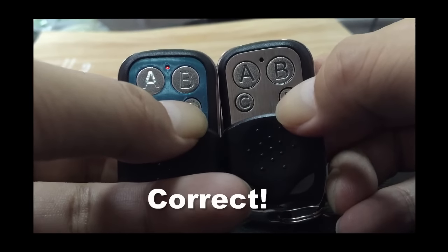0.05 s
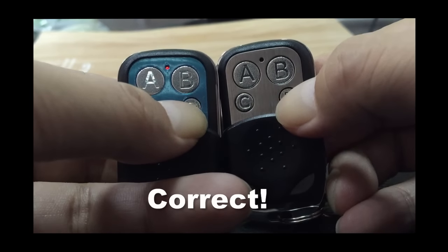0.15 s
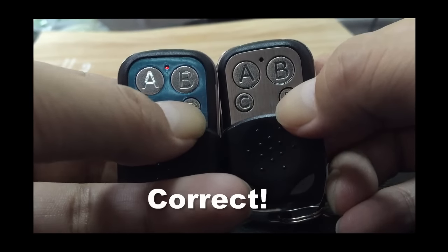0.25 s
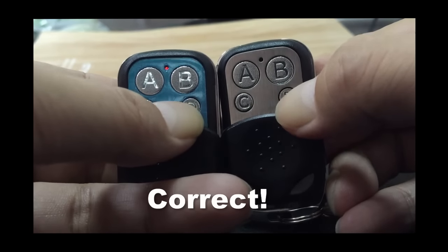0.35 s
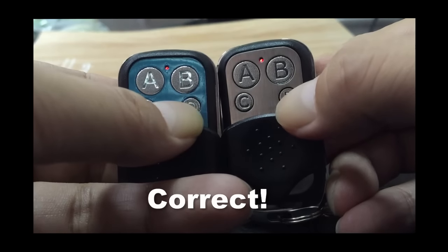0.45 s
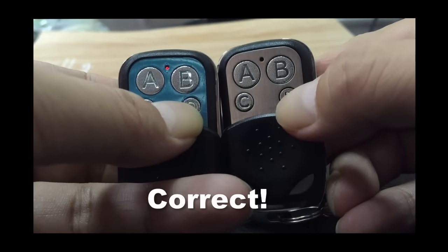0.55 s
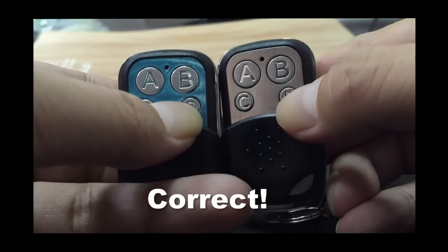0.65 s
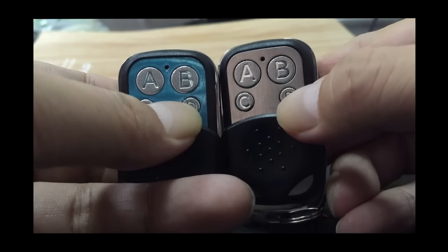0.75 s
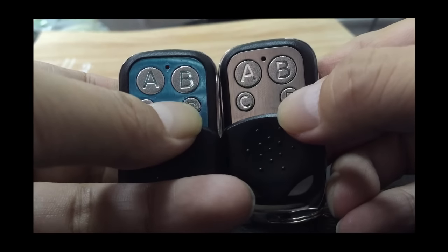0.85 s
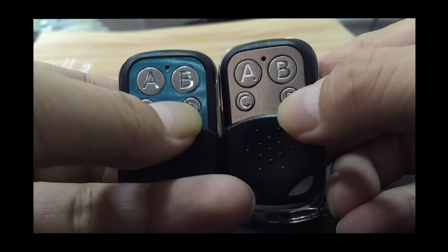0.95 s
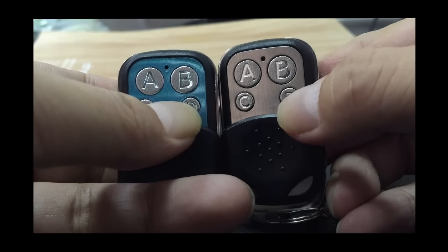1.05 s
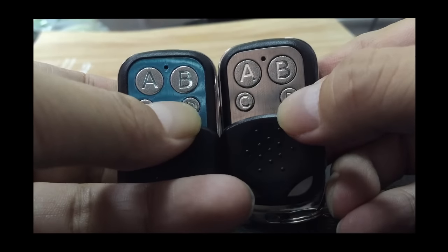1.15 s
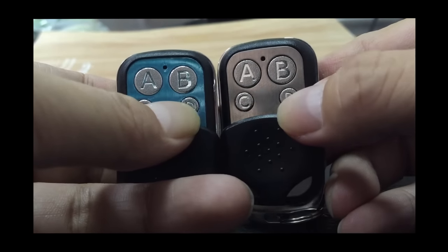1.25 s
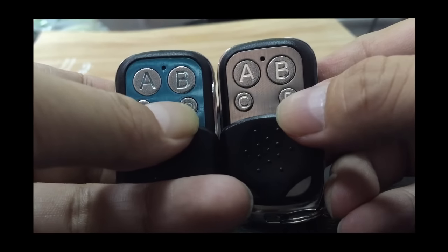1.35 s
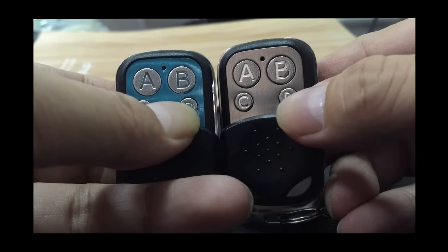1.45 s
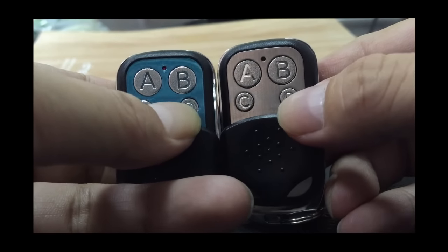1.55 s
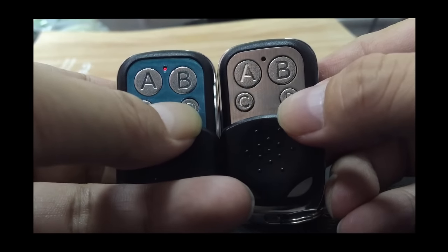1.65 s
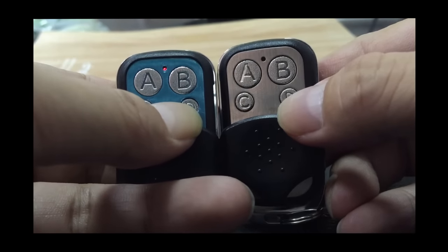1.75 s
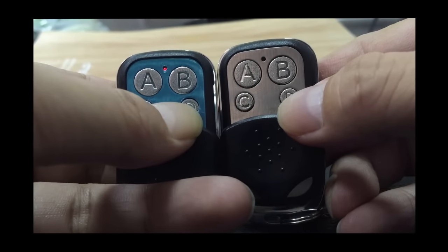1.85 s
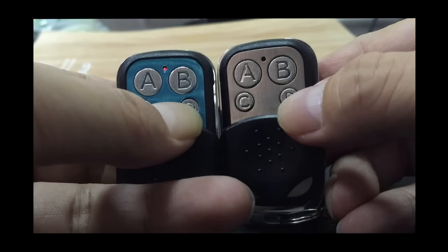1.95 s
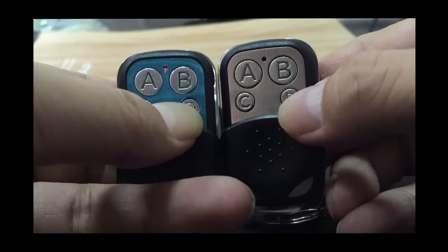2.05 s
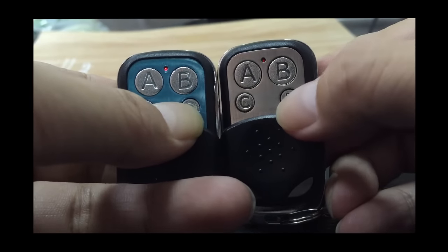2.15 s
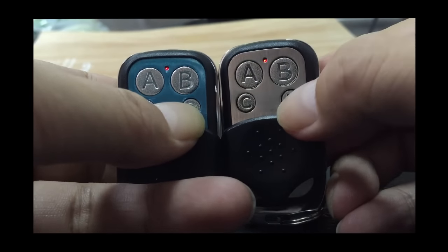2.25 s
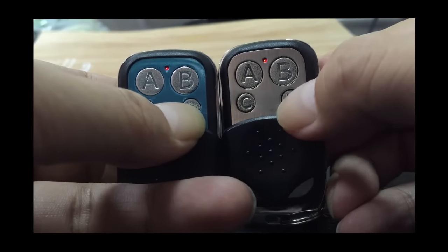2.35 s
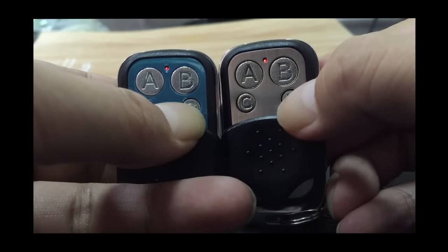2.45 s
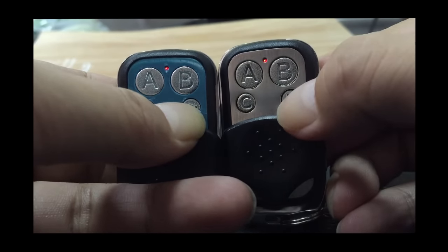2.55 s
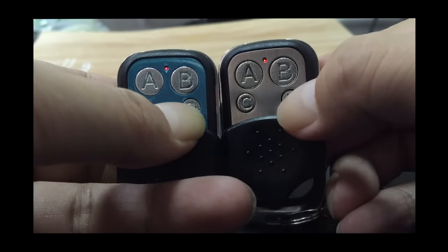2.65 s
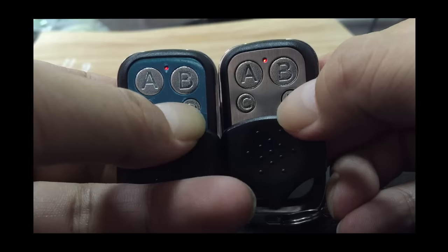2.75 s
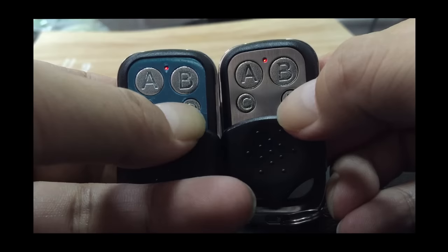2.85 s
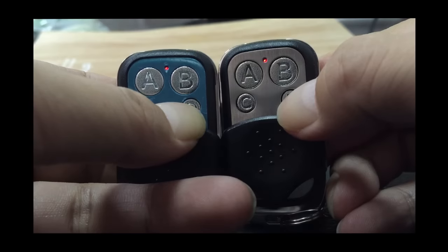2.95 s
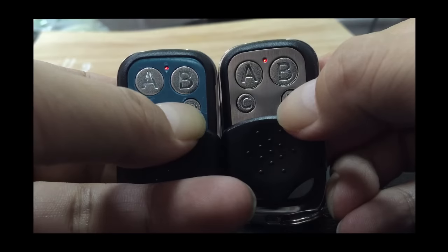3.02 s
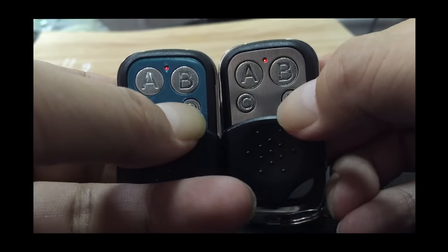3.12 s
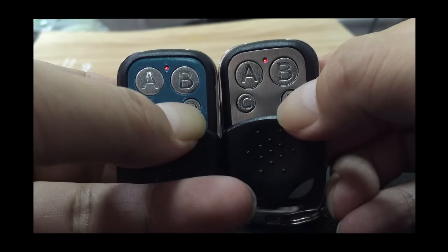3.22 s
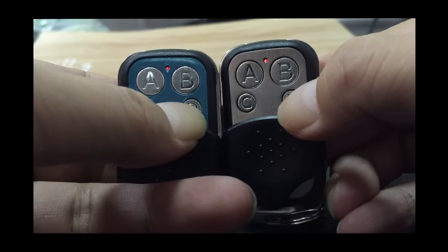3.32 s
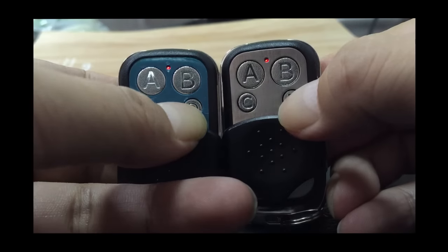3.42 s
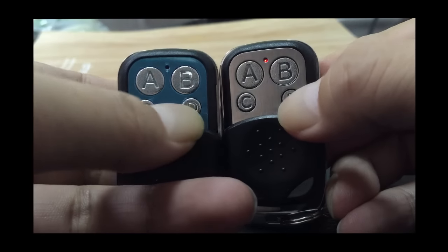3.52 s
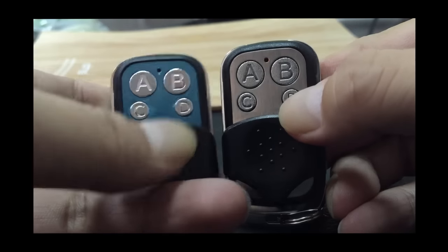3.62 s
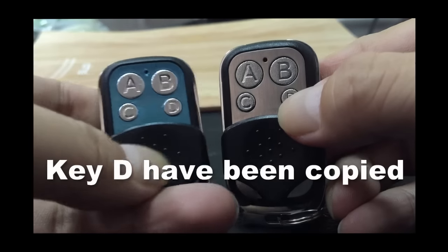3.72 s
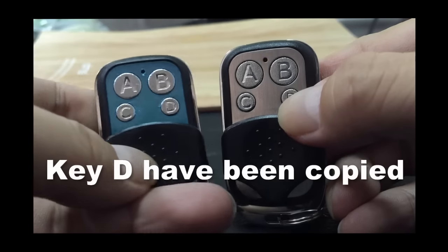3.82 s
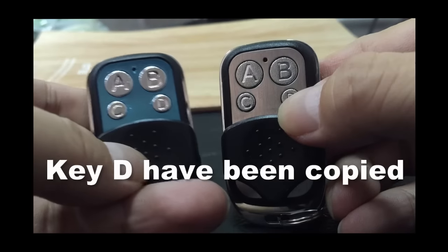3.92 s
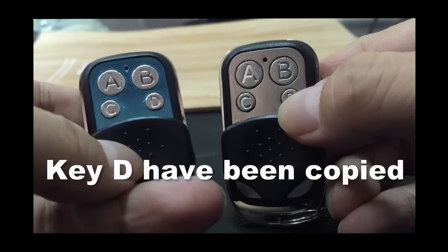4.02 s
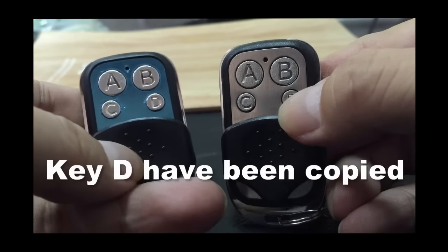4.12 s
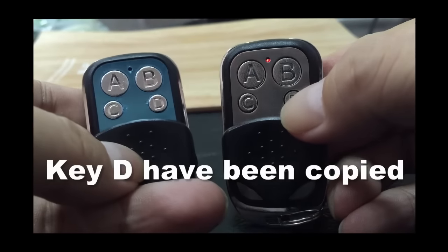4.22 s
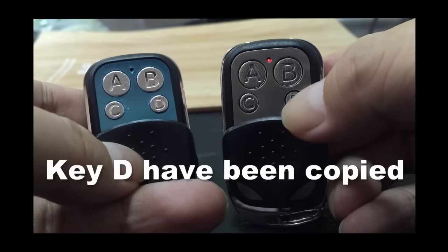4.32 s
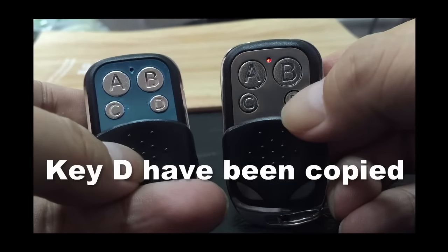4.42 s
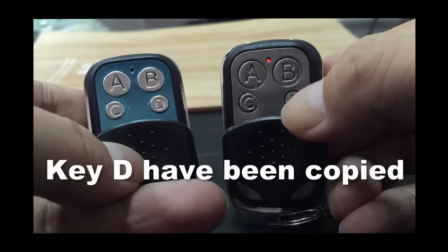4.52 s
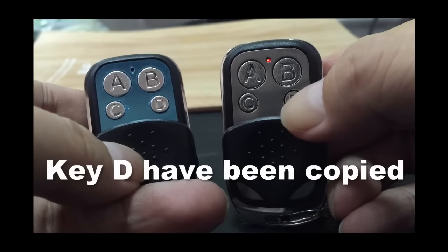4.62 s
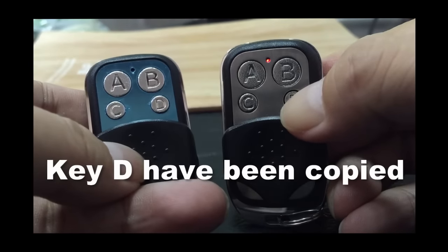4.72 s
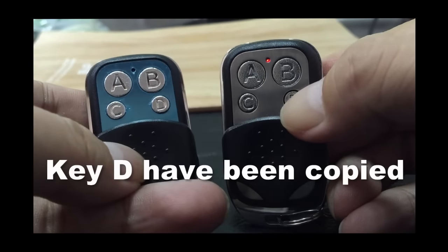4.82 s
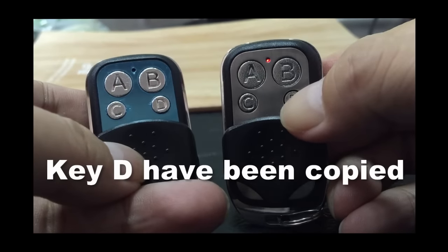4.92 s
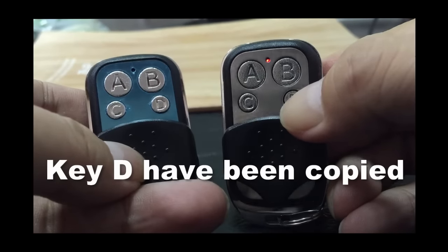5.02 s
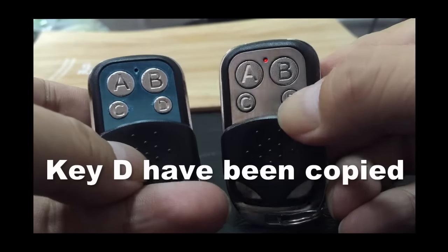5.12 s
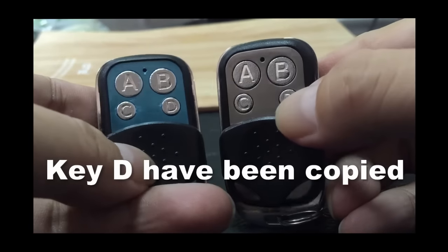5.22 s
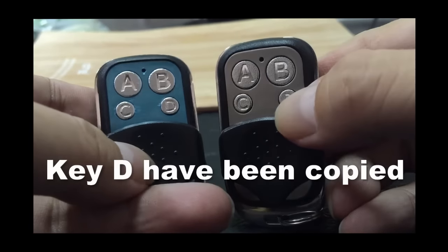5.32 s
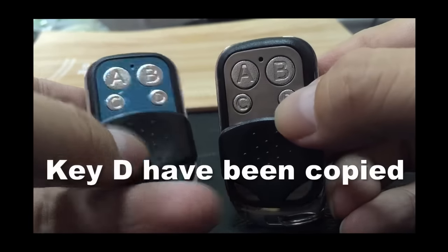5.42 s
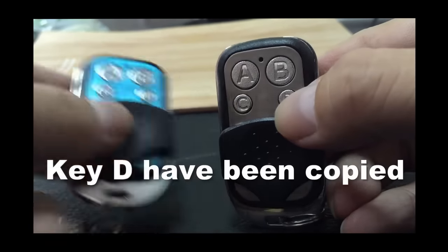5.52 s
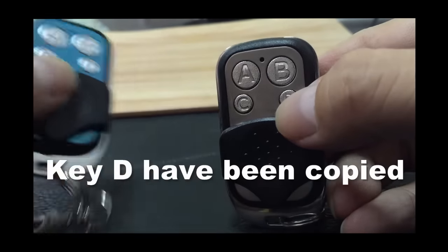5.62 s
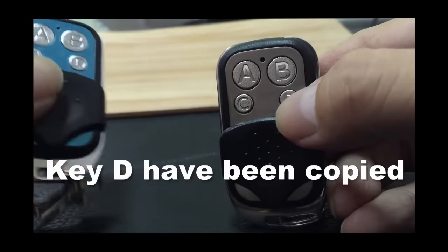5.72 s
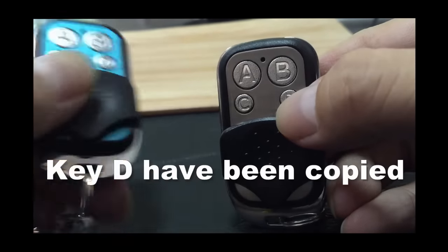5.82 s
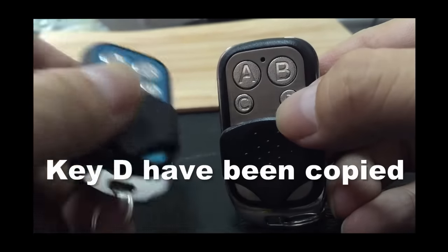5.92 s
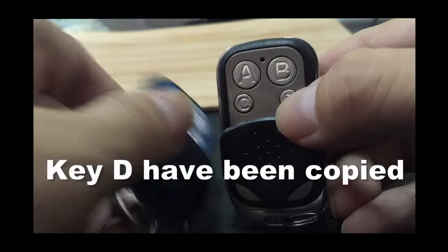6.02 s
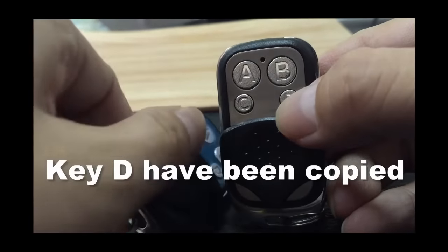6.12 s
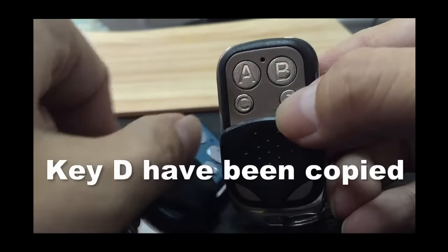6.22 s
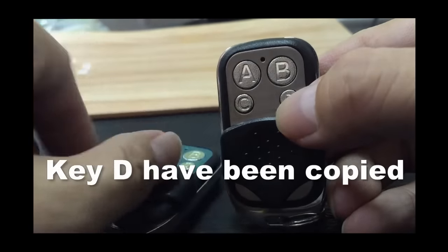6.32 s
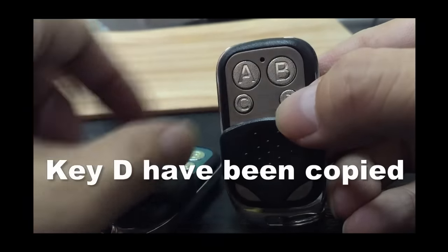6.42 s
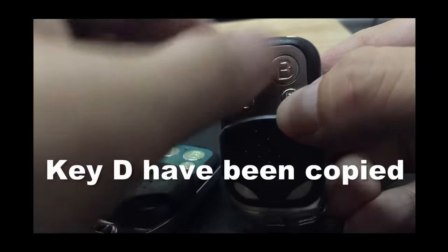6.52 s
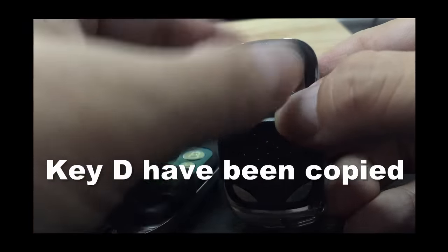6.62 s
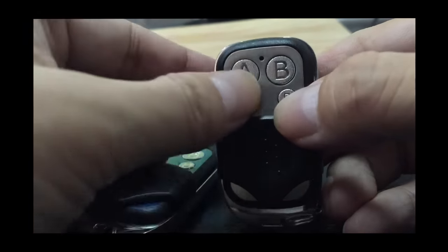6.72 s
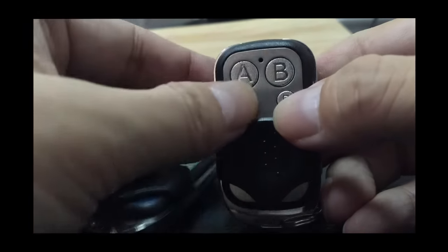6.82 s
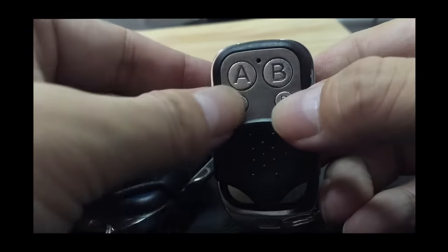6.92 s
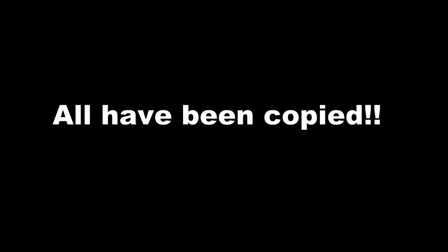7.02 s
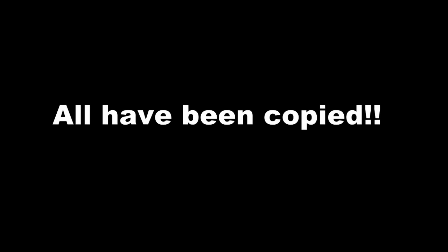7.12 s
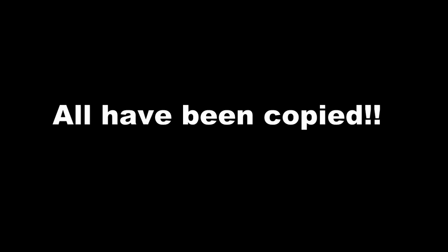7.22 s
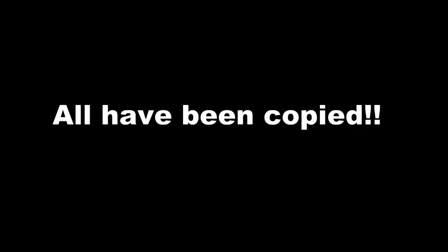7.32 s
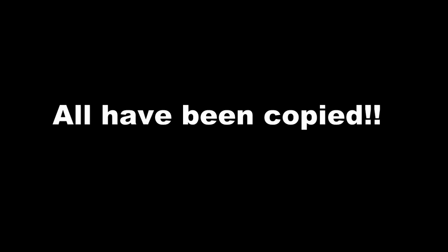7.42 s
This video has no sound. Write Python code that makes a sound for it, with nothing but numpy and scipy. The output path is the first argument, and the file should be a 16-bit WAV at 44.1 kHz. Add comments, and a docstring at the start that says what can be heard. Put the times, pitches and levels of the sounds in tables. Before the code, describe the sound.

In a quiet indoor room with a low, wavering hum, thumbs press buttons on two small plastic remotes very near the microphone. Crisp dry clicks come irregularly, some in close pairs, with faint finger rustle. Later one remote is carried off, its key ring rattling and scraping, and set on the desk with a hard knock. Two more clicks, the last very faint, then an abrupt stop.

```python
"""A dull, wavering hum of a quiet room, then sharp clicks close to the microphone: thumbs press the buttons
of two small plastic remotes. Each metal dome snaps and rings the shell as dying sines.
Fingers rustle and plastic scrapes as random slips; later one remote is carried off with its key ring
rattling in chattering ticks and is laid on the desk with ringing knocks. The sound then stops short."""
import sys
import numpy as np
from scipy import signal
from scipy.fft import rfft, irfft
from scipy.io import wavfile
from scipy.ndimage import uniform_filter1d

SR = 44100
rng = np.random.default_rng(int(sys.argv[2]) if len(sys.argv) > 2 else 0)


def int16_out(signal):
    """Quantize to a 16-bit WAV file."""
    q = np.round(np.clip(np.atleast_2d(signal).T, -1, 1) * 32767)
    wavfile.write(sys.argv[1], SR, q.astype(np.int16))


N = 328986  # length [samples]
SLIP_SPREAD_DB = 3.6  # unevenness of the tiny slips


def gain_of(db):
    """Decibels to an amplitude factor."""
    return 10 ** (np.asarray(db) / 20)


def evened(x):
    """Scales to rms 1."""
    return x / np.sqrt(np.mean(x ** 2) + 1e-20)


def read(points, hz):
    """Reads a table on a log-frequency axis."""
    f, value = np.transpose(points)
    return np.interp(np.log(hz + 1), np.log(f + 1), value)


def add(mix, s, sound):
    """Mixes a sound in at a time [s]."""
    part = mix[..., round(s * SR):][..., :sound.shape[-1]]
    part += sound[..., :part.shape[-1]]


def coloured(x, points):
    """Filters a signal by a (frequency [Hz], level [dB]) table."""
    spectrum = rfft(x)
    hz = np.fft.rfftfreq(len(x), 1 / SR)
    return irfft(spectrum * gain_of(read(points, hz)), len(x))


def ring(modes, extra_db, seconds, rise_s, late_s=0):
    """Dying sines of alternate sign, as neighbouring modes are; peak 1."""
    hz, db, t60 = np.transpose(modes)[:, :, None]
    t = np.maximum(np.arange(round(seconds * SR)) / SR - late_s, 0)
    sign = (-1.) ** np.arange(len(modes))[:, None]
    decay = gain_of(db + extra_db[:, None] - 60 * t / t60)
    out = (sign * decay * np.sin(2 * np.pi * hz * t)).sum(0)
    out *= 1 - np.exp(-t / rise_s)
    return out / abs(out).max()


def hum():
    """Dull noise in drifting patches with fuzzy low tones, each a narrow band of noise."""
    # colour of the dull room noise: (frequency [Hz], level [dB])
    air_colour = [(25, -43.5), (40, -24.5), (62, -13), (80, -6), (125, -7), (156, -2), (278, -4),
                  (330, -8.5), (430, -11.5), (510, -15.5), (600, -12), (782, -15.5), (950, -16.5),
                  (1150, -27), (1330, -25), (1600, -30.5), (2310, -33.5), (9000, -47), (14500, -54),
                  (16500, -71.5)]
    # wavering tones of the hum: (frequency [Hz], width [Hz], rms level [dB])
    hum_tones = [(47.5, 6.6, -59), (86, 4.7, -62.5), (97, 8.2, -56), (146, 6.5, -61.5), (169, 8, -58),
                 (192, 8, -63.5), (233.2, 14, -58), (267, 7.4, -56.5), (292.6, 13, -54.5)]
    air_db, patch_db = -49, 2.22
    hz = np.fft.rfftfreq(N, 1 / SR)
    air = coloured(rng.standard_normal(N), air_colour)
    z = signal.stft(air, nperseg=1024, noverlap=768)[2]
    over_pitch = uniform_filter1d(rng.standard_normal(z.shape), 8, 0)
    patches = evened(uniform_filter1d(over_pitch, 12, 1))
    drifting = signal.istft(z * gain_of(patch_db * patches), nperseg=1024, noverlap=768)[1][:N]
    out = gain_of(air_db) * evened(drifting)
    for f, width, db in hum_tones:
        band = rfft(rng.standard_normal(N)) / (1 + (2 * (hz - f) / width) ** 2)
        out += gain_of(db) * evened(irfft(band, N))
    return out


def snaps():
    """The dome snaps through and rebounds a fraction of a millisecond later, waking the modes in another mix.
    Returns left, right and what spreads into the room."""
    # dome presses: (time [s], rebound delay [ms], level with the energy packed into snap_ms [dB],
    # then nine zone levels, low to high, against the zone at 6200 Hz [dB])
    presses = [(0.351, 0.57, -43.5, -3, 14, -8, -10, -21, -11, 9, 6.0, 12),
               (0.807, 0.6, -9, -10, -12, -10.5, -8, -20, -7, -5.5, -4.5, -1),
               (0.8536, 0.53, -8, -5.5, 0.5, 2, 5, -5, 4.5, -2.5, -6.5, 4),
               (1.315, .6, -54.5, 0, 6.5, 0.5, -6, -13.0, -7.5, 9.0, 16, 9.5),
               (1.6976, 0.091, -17.5, 9, 2.5, 14.5, 16.5, 22.5, 13.5, 15.5, 9.5, 20),
               (2.2904, 0.55, -15, 0.5, 1.5, 3.5, 7, -5, -2, 3, 10.5, 3),
               (2.482, .6, -34.5, -22.5, -21, -13.0, -18, -19, -5, 7, 10, 2),
               (3.673, 0.57, -10.5, 0.5, 4, -1, -4.5, -5.5, -4.5, 0, -6, -11),
               (3.784, 0.61, -16.5, 8.5, 15, 11, 13, 5.5, 12.5, 5, 15, 8),
               (3.794, .5, -10, -16, -3.5, -5.5, -23, -31, -12, -0.5, -1, -14),
               (4.006, 0.553, -25.5, -12.5, 9.5, 3.5, 6, 6.5, 2.5, 4, -2, -9),
               (4.338, 0.53, -15, -0.5, 2, 8.5, 2.5, -3, 3, 9.5, 10.5, 12),
               (5.322, 0.57, -10.5, -9, -11, -7, -11.5, -12, -11, 1, -4, -8),
               (6.862, 0.47, -12, -4, -4, 4.5, 1, 13, -2.5, 12.5, 7.5, -2),
               (7.097, 0.62, -39.5, -6.5, -9.5, 22.5, 8, 5, -15, 16, -10, -4)]
    # modes of the plastic shell: (frequency [Hz], level [dB], t60 [s])
    shell_modes = [(490, -12, 0.0027), (600, -4, .007), (753, 0, 0.007), (980, 1, 0.0067),
                   (1440, -3, 0.0084), (1724, 0, 0.0044), (2075, 2, 0.0063), (2350, -0.5, .005),
                   (2600, 0.5, 0.0047), (3090, -4.5, 0.0042), (3680, 0.5, 0.0033), (3850, -3, 0.0034),
                   (4300, 7.5, 0.0034), (4760, 2.5, 0.00042), (5810, 7.5, 0.0033), (6860, -2.5, 0.0061),
                   (7383, 3.5, 0.0026), (8430, 2, 0.0034), (9460, 1.5, 0.0041), (11200, -3, 0.0041),
                   (11350, 2.5, 0.0023), (12100, 0, .003), (12900, 2.5, 0.0025), (16000, -6.5, 0.0071)]
    # centres of the zones: (frequency [Hz])
    zones_hz = [700, 1100, 2000, 2550, 3100, 4200, 6200, 8600, 11500, 15000]
    snap_ms, start_delay_s = 0.52, .0008  # all clicks start this much after their listed times
    rebound_db, rebound_mix_db, rebound_detune = -6, 1, .008
    blur_hz, spread_db = 2640, 4  # off to the sides the modes blur into one short even crack
    out, hz = np.zeros((3, N)), np.array(shell_modes)[:, 0]
    mixes = rng.standard_normal((len(presses), 3, len(shell_modes)))
    for (s, late_ms, db, *zone_db), (detune, strength, lean) in zip(presses, mixes):
        all_zones_db = np.insert(zone_db, zones_hz.index(6200), 0)
        tilt_db = read(list(zip(zones_hz, all_zones_db)), hz)
        shifted = np.array(shell_modes) * np.c_[1 + rebound_detune * detune, np.ones((len(hz), 2))]
        # each mode beams to one side or the other, high ones most
        lean_db = lean * (0.69 + 4.4 * (hz / 16000) ** 2)
        first, second = [], []
        for side in (1, -1):
            side_db = tilt_db + side * lean_db
            first.append(ring(shell_modes, side_db, .03, rise_s=.0005))
            second.append(ring(shifted, side_db + rebound_mix_db * strength, .03,
                               rise_s=0.00021, late_s=late_ms / 1000))
        blow = np.array(first) + gain_of(rebound_db) * np.array(second)
        blow *= np.sqrt(2 * snap_ms * SR / 1000) / np.linalg.norm(blow)
        length = blow.shape[1]
        power = uniform_filter1d(abs(rfft(blow[0])) ** 2, round(blur_hz * length / SR))
        spread = np.roll(irfft(np.sqrt(abs(power)), length), 40)
        spread[80:] = 0
        spread *= gain_of(spread_db) * np.linalg.norm(blow) / np.linalg.norm(spread) / 2
        add(out, s + start_delay_s, gain_of(db) * np.vstack([blow, spread]))
    return out * gain_of([[-.3], [.3], [0]])


def room(x):
    """A short and a longer lumpy reflection and a faint tail start together, just after the direct sound.
    Three random noise tails crossfade in turn, so that no single tail colours every sound."""
    # decay of the faint tail: (frequency [Hz], t60 [s])
    tail_t60 = [(300, 0.47), (700, 0.35), (1400, 0.19), (2500, 0.2), (4000, 0.17), (7000, 0.22),
                (12000, 0.089)]
    # colour of the faint tail: (frequency [Hz], level [dB])
    tail_colour = [(300, 5), (700, 4.5), (1400, 2), (2500, 0), (4000, 0.5), (7000, -1), (12000, -1),
                   (16000, -10)]
    # colour of the lumpy reflections: (frequency [Hz], level [dB])
    near_colour = [(500, -11.5), (1500, -9.5), (3000, -6), (5000, -5.5), (6500, 0), (8500, -5), (12000, 4),
                   (15500, 1), (16500, -11.5)]
    lumpy_db = 6.5  # nearby things throw back uneven clumps
    delay = 30  # [samples]
    out, turn = np.zeros((2, N)), np.pi * np.arange(N) / SR / .07
    for k in range(3):
        hz, t, z = signal.stft(rng.standard_normal(SR // 2), SR, nperseg=256)
        fall_db = read(tail_colour, hz)[:, None] - 60 * t / read(tail_t60, hz)[:, None]
        tail = signal.istft(z * gain_of(fall_db), SR, nperseg=256)[1]
        both = gain_of(-19.0) * tail / np.linalg.norm(tail)
        size = len(tail)
        for db, t60 in ((-29, 0.01), (-21.0, 0.29)):
            near = np.array([coloured(v, near_colour) for v in rng.standard_normal((3, size))])
            near = near * gain_of(-60 * np.arange(size) / SR / t60)
            clumps = evened(uniform_filter1d(rng.standard_normal(size), size=130))
            # one part common to left and right, one part of each side's own
            near = (near[0] + .5 * near[1:]) * gain_of(lumpy_db * clumps)
            both = both + gain_of(db) * near / np.linalg.norm(near[0])
        share = np.sqrt(2 / 3) * np.cos(turn + k * np.pi / 3)
        out[:, delay:] += signal.oaconvolve((x * share)[None], both, axes=1)[:, :N - delay]
    return out


def slides():
    """Dense tiny slips of uneven size, blurred into a scratchy rustle and a duller rub of the shell."""
    # strokes of fingers and links sliding: (start [s], length [s], rustle level [dB], rub level [dB])
    strokes = [(2.357, 0.21, -70.5, -69.5), (3.486, 0.097, -67, -74), (3.562, 0.39, -59, -62),
               (3.853, 0.078, -66.5, -66.5), (4.072, 0.063, -69, -63), (5.585, 0.16, -51.5, -69),
               (5.63, 0.026, -57, -38), (5.644, 0.18, -55, -58.5), (5.806, 0.14, -69, -85),
               (5.916, 0.2, -56.5, -58.5), (6.094, 0.24, -63.5, -68.5), (6.257, 0.085, -61.5, -69),
               (6.31, 0.046, -48, -58.5), (6.352, 0.033, -43, -58), (6.408, 0.087, -69, -76),
               (6.442, 0.16, -56, -64), (6.672, 0.092, -65.5, -73), (6.822, 0.064, -53, -53.5),
               (6.89, 0.053, -86, -59.5), (7.002, 0.069, -63.5, -60.5), (7.077, 0.034, -62.5, -61.5)]
    # colour of the scratchy rustle: (frequency [Hz], level [dB])
    rustle_colour = [(1650, -46), (2450, -8), (3450, -3), (4120, -7), (5670, -5.5), (7200, -4.5),
                     (10600, -9), (15100, -7.5), (16100, -17), (16500, -36.5)]
    # colour of the duller rub: (frequency [Hz], level [dB])
    rub_colour = [(900, -52), (1300, 2), (1600, -9), (2050, 2), (2500, -24.5), (3100, -10), (5000, -70.5)]
    grip_share, lift_share, fade_db = 0.19, 0.24, -6.5  # a stroke swells, fades slowly and lifts off
    level = np.zeros((2, N))
    for start, length, rustle_db, rub_db in strokes:
        share = np.linspace(0, 1, round(length * SR))
        swell = np.minimum(share / grip_share, 1)
        lift = np.minimum((1 - share) / lift_share, 1)
        shape = swell * lift * gain_of(fade_db * np.maximum(share - grip_share, 0))
        add(level, start, gain_of([[rustle_db], [rub_db]]) * shape)
    level = uniform_filter1d(level, 400)
    out = np.zeros(N)
    for gain, colour, per_s in zip(level, (rustle_colour, rub_colour), (900, 250)):
        sizes = gain_of(SLIP_SPREAD_DB * np.minimum(rng.exponential(1, N), 5))
        slips = sizes * (rng.random(N) < per_s / SR)
        flutter = 1.2 + evened(signal.lfilter([1], [1, -.985], slips))
        out += gain * evened(coloured(flutter * rng.standard_normal(N), colour))
    return out


def scrapes():
    """A plastic edge catches and slips unevenly on plastic; each slip rings the same few modes."""
    # scrapes: (start [s], length [s], level [dB], pitch of the strongest mode [Hz])
    strokes = [(3.511, 0.043, -67.5, 2470), (3.539, 0.027, -69, 3870), (3.58, 0.039, -68, 2370),
               (5.659, 0.045, -49, 3560), (5.725, 0.054, -53.5, 3440), (5.78, 0.015, -58, 3460),
               (5.905, 0.016, -56.5, 3380), (5.994, 0.038, -53.5, 3280), (6.138, 0.034, -65, 3400)]
    # scraped modes: (share of that pitch [ratio], level [dB], t60 [s])
    scraped_modes = [(.585, -6, .02), (1, 1, .016), (1.6, -6.5, 0.014), (1.87, -7.5, .014),
                     (2.6, -7, 0.011)]
    slips_per_s, loudest_slip = 380, 3  # the loudest in units of the spread
    out = np.zeros(N)
    sizes = gain_of(SLIP_SPREAD_DB * np.minimum(rng.exponential(1, N), loudest_slip))
    slips = sizes * (rng.random(N) < slips_per_s / SR)
    slips = slips + 0.018 * rng.standard_normal(N)
    for start, length, db, pitch_hz in strokes:
        part = slips[round(start * SR):][:round(length * SR)]
        modes = np.array(scraped_modes) * [pitch_hz, 1, 1]
        body = ring(modes, np.zeros(len(modes)), .05, rise_s=.0003)
        sound = np.convolve(part * np.sqrt(np.hanning(len(part))), body)
        add(out, start, gain_of(db) * sound / np.linalg.norm(sound) * np.sqrt(len(part)))
    return out


def key_ring():
    """Each contact chatters for some milliseconds and catches the ring at another spot: modes shift a little."""
    # ticks: (time [s], peak level [dB], brightness [dB per octave], dull knock of the clasp [dB],
    # small links near link_hz [dB], chatter length [ms])
    ticks = [(3.749, -45.5, -2, -5, -1, 1.9), (3.8556, -43.5, -5, -11, 2, 2.1),
             (3.867, -49, -5, -8, 0, 1.5), (3.879, -41, -5, -3, 9, 2), (3.892, -48, -9, 3, 0, 1.9),
             (5.405, -41.5, -2, 0, 1, 4.1), (5.6028, -37.5, -3, -9, 3, .6), (5.6065, -48, -6, 1, 1, 1),
             (5.627, -31.5, -3.5, -1, 0, 4.2), (5.6292, -29, -4, 13, -1, 3.3),
             (5.636, -20.5, -3, 8, 1, 1.5), (5.6414, -21, -2, 8, 1, 1.3), (5.65, -22.5, 1, -5, -5, 1.5),
             (5.659, -31, 6, 5, 0, 1.4), (5.662, -28, 7, 2, 2, 3.3), (5.6868, -49, 1, 0, 9, 2),
             (5.7168, -32.5, 2, -8, 6, 0.61), (5.72, -34, -4, -8, 0, 2.5), (5.761, -38.5, 2, -6, -2, 1.5),
             (5.786, -38.5, 8, 17, 0, 6.8), (5.8481, -46.5, 8, 1, 5, 2.6), (5.8587, -48, 4, 4, 0, 3),
             (5.91, -38, 4, -7, 4, 3.2), (5.9166, -42, 10, 6, 2, 3), (5.9465, -36.5, 5, 0, 4, 3.7),
             (5.9595, -28, 3, -1, 1, 2.5), (5.9638, -33, 3, 2, 1, 1.8), (6.0038, -32, 0, 0, 3, 1.8),
             (6.008, -32, 3, 6, -1, 4.4), (6.0143, -28, 0.5, 4, -8, 2.5), (6.054, -30, 0, 3, 1, 1.4),
             (6.059, -33, 4, -4, 4, 2.5), (6.0783, -44, 5, -8, 4, 4), (6.13, -45, -14, -13, -4, 2.2),
             (6.14, -40, -3, -13, -6, 1.5), (6.15, -43, -1, -12, 4, 1), (6.153, -36, -6, -23, -6, 1.35),
             (6.2595, -44, -3.5, -12, 0.5, 2.3), (6.265, -36.5, -4, -15.5, 2, 3.4),
             (6.2785, -39.5, -6, -6, 4, 2.7), (6.306, -37.5, 1, 1, 4.5, 1.5), (6.314, -38.5, 0, 3, 3, 0.9),
             (6.3163, -37.5, -1, -0.5, 5, 1), (6.319, -32.5, -1.5, 0.5, 5, 1),
             (6.321, -20.5, 0.5, -11, 13.5, 1.7), (6.326, -20.5, 2, -8.5, 10.5, 2.8),
             (6.346, -36.5, 0.5, 7.5, 6.5, 3.8), (6.3585, -24.5, 3, -2.5, 7, 0.91),
             (6.3627, -29, -1, 3, 3, 0.65), (6.3653, -23.5, -2, -5.5, -2.5, 1.5),
             (6.374, -36, -3, -12.5, 5, 1.2), (6.4662, -28.5, -1.5, -21.5, -2, 4.8),
             (6.482, -39.5, -7, -5, 1, 3.6), (6.492, -30.5, -3, -5, -0.5, 2.2),
             (6.5032, -22, -7.5, -12.5, -1.5, 3.3), (6.5233, -37.5, 4.5, 6, 0, 3.6),
             (6.537, -40.5, 6.5, 7, 1.5, 4.13), (6.58, -42.5, -1, -10.5, 2, 4),
             (6.682, -44, 3, -7, -3, 1.2), (6.711, -42, -2.5, -14.5, -1, 4.3), (6.721, -50, 13, -6, 0, 1.8),
             (7.0182, -38, 2, 0, -4, 5.5)]
    # modes of key ring and clasp: (frequency [Hz], level [dB], t60 [s])
    ring_modes = [(1230, 7, 0.0043), (1700, -0.5, 0.012), (2015, -6, 0.024), (2740, -4.5, 0.016),
                  (3550, -2.5, 0.026), (4330, 2, 0.01), (5340, 5.5, 0.0059), (6000, 2.5, 0.0125),
                  (6490, 3.5, 0.011), (7030, 4, 0.0072), (7700, 1, 0.0091), (8120, 4.5, 0.0053),
                  (9200, 3, 0.013), (10400, 2, 0.0031), (11200, 5.5, 0.0054), (12900, 5, 0.0055),
                  (15100, 4.5, 0.0077), (15560, -8.5, 0.0066)]
    clasp_hz, link_hz, link_octaves = 2400, 6800, .35
    first_touch = 5.7  # first contact against the chatter after it
    out, hz, t = np.zeros(N), np.array(ring_modes)[:, 0], np.arange(600) / SR
    spots = rng.standard_normal((len(ticks), len(ring_modes)))
    chatters = rng.standard_normal((len(ticks), len(t))) ** 3
    links = np.exp(-(np.log2(hz / link_hz) / link_octaves) ** 2)
    octaves_up = np.log2(np.maximum(hz / clasp_hz, 1))
    for (s, db, bright_db, clasp_db, link_db, length_ms), detune, chatter in zip(ticks, spots, chatters):
        modes = np.array(ring_modes) * np.c_[1 + .02 * detune, np.ones((len(hz), 2))]
        extra_db = bright_db * octaves_up + clasp_db * (hz < clasp_hz) + link_db * links
        body = ring(modes, extra_db, 0.0307, rise_s=.0001)
        fade = np.exp(-(t * 1000 / max(length_ms, .3)) ** 2)
        tick = np.convolve(np.r_[first_touch, chatter[1:]] * fade, body)
        add(out, s, gain_of(db) * tick / abs(tick).max())
    return out


def knocks():
    """The remote meets the desk top: a hard edge wakes the upper modes, a soft heavy touch the lowest."""
    # knocks: (time [s], peak level [dB], added below 220 Hz [dB], added above 700 Hz [dB])
    touches = [(5.659, -39, 13, -10), (6.261, -27.5, 11.5, -13), (6.268, -35.5, 7.5, -12.5),
               (6.505, -8.5, -2.5, 7.5)]
    # modes of the desk: (frequency [Hz], level [dB], t60 [s])
    desk_modes = [(99, -12.5, 0.042), (196, 1, 0.049), (257, -7, 0.062), (316, 4.5, 0.052),
                  (383, 6.5, 0.027), (449, 2, 0.047), (600, 2, 0.022), (698, 0.5, 0.031),
                  (773, -7.5, 0.016), (1041, 7.5, 0.013), (1172, 6.5, 0.01235), (1500, 4, 0.0079),
                  (1870, -1, 0.011)]
    out, hz = np.zeros(N), np.array(desk_modes)[:, 0]
    for s, db, soft_db, hard_db in touches:
        extra_db = soft_db * (hz < 220) + hard_db * (hz > 700)
        add(out, s, gain_of(db) * ring(desk_modes, extra_db, 0.4, rise_s=0.00067))
    return out


def scene():
    """Close sources with their reflections over the hum, nearly alike in both channels."""
    # what the desk radiates into the room: (frequency [Hz], level [dB])
    desk_send = [(200, 1), (450, 3.5), (650, 0), (1100, -0.5), (1700, 1), (4000, 0.5)]
    clicks, desk = snaps(), knocks()
    handling = key_ring() + slides() + scrapes()
    sent = clicks[-1] + handling + coloured(desk, desk_send)
    close = clicks[:2] + handling * gain_of([[-.2], [.2]]) + desk * gain_of([[-.3], [.3]])
    return close + room(sent) + hum()


def record(dry):
    """The sound stops short; then a steep low-pass limits the band."""
    stop_s, edge_hz = 7.1238, 16700
    running = dry * (np.arange(N) < stop_s * SR)
    low_pass = signal.firwin(255, edge_hz, window=("kaiser", 9), fs=SR)
    return signal.oaconvolve(running, low_pass[None], "same")


dry = scene()
out = record(dry)
int16_out(out)
```